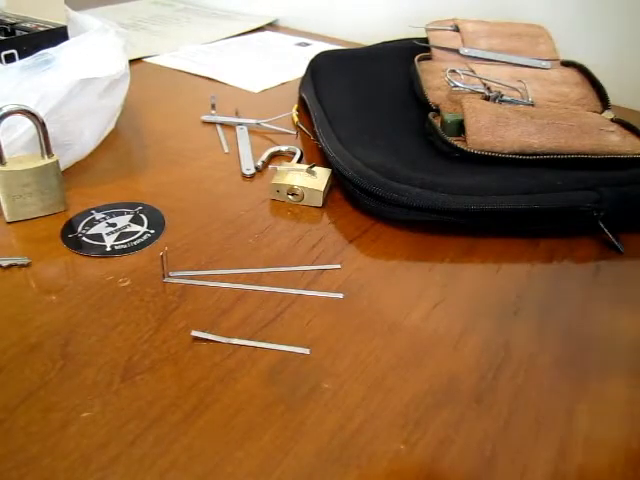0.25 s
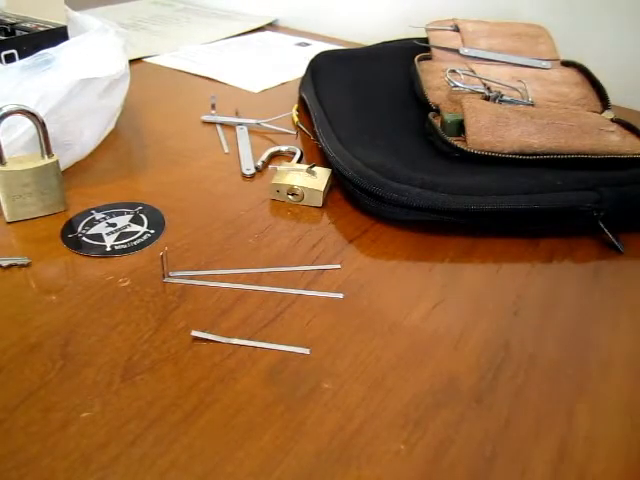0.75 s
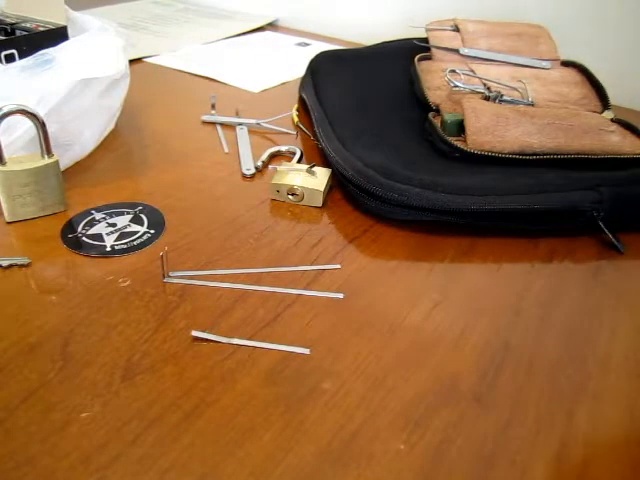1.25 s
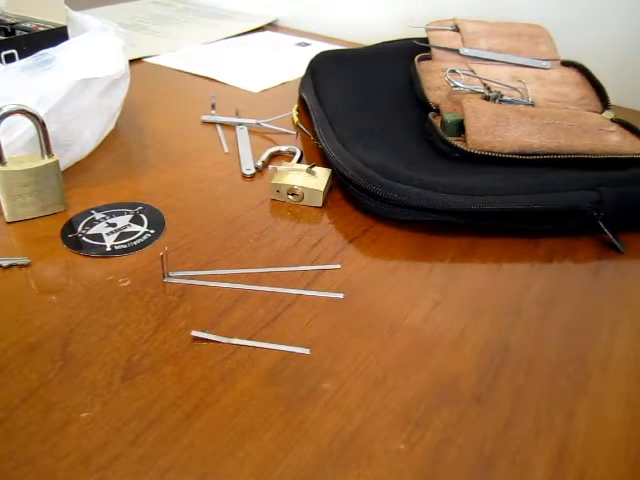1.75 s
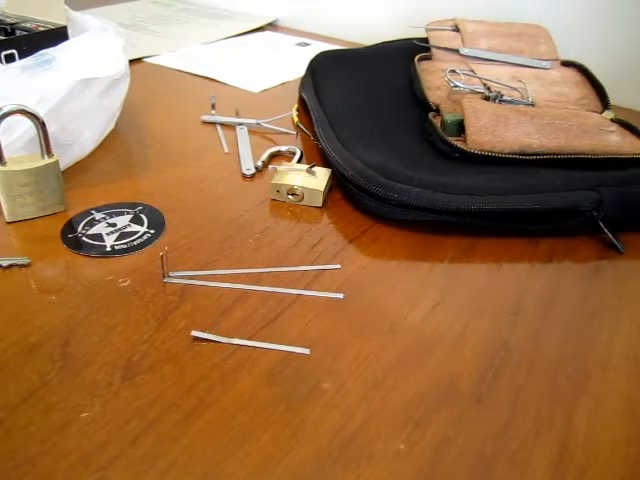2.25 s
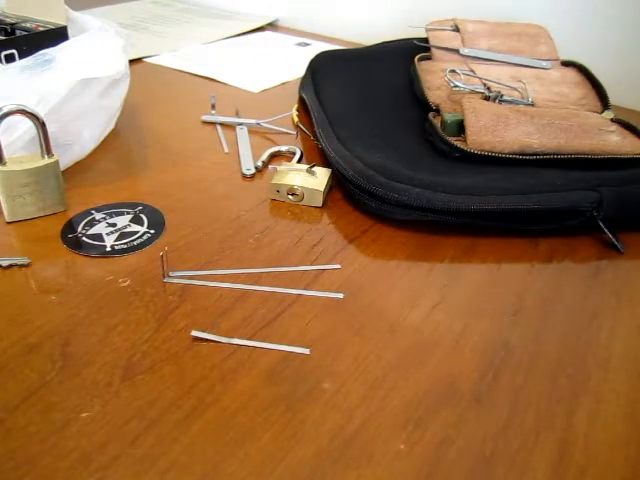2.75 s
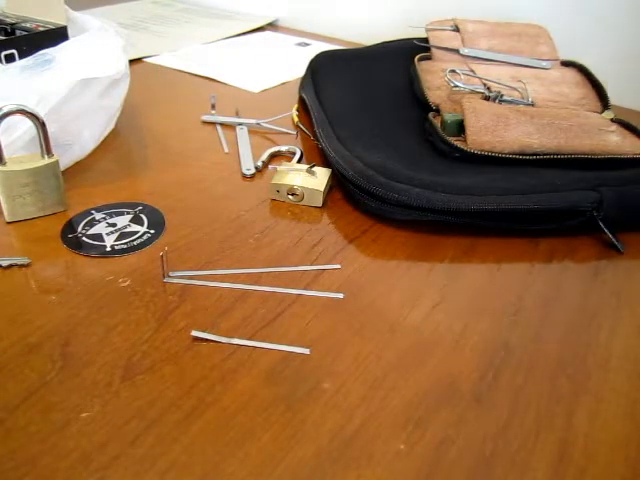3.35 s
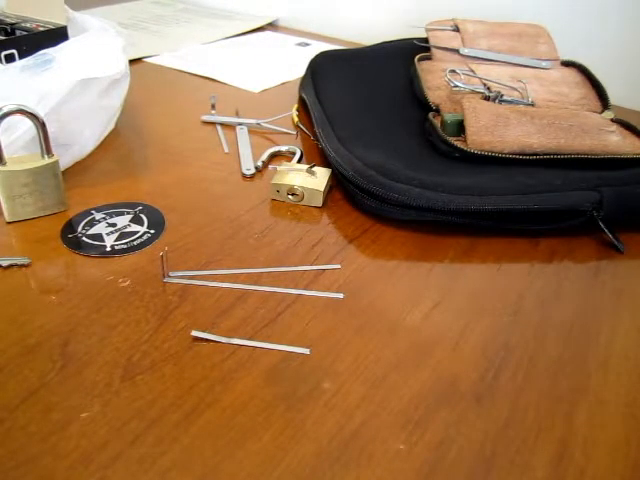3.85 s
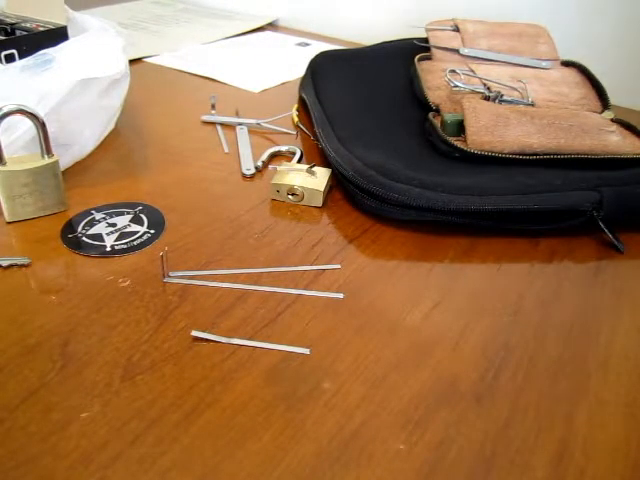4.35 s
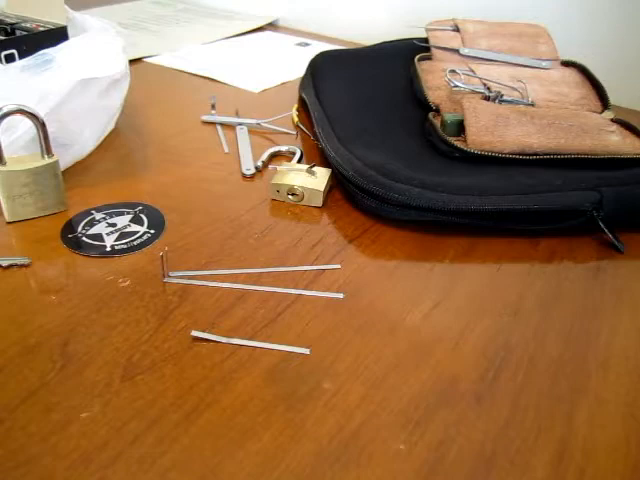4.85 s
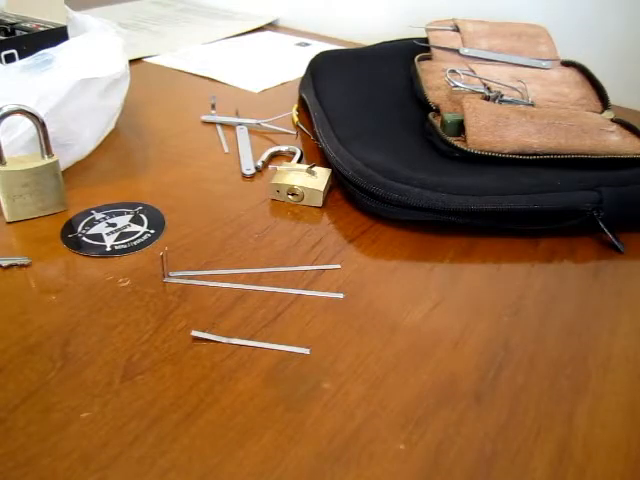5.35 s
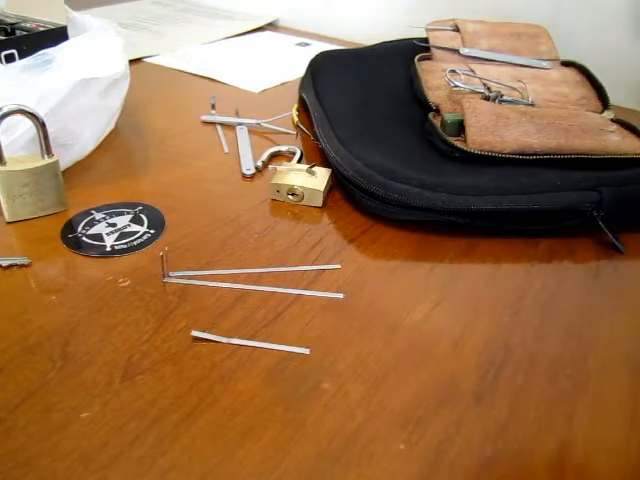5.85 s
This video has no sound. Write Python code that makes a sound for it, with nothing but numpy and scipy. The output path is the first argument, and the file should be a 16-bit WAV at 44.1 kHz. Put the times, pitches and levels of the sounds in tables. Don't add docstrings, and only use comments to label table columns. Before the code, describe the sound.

Steel handcuffs clink and jingle in hands close by, with ratchet clicks, a fast ratcheting zip and thin metallic ringing over low room hum.

```python
import sys
import numpy as np
from scipy import signal
from scipy.fft import rfft, irfft, next_fast_len
from scipy.io import wavfile
from scipy.ndimage import uniform_filter1d

SR = 44100
rng = np.random.default_rng(int(sys.argv[2]) if len(sys.argv) > 2 else 0)


def dump_mix(stems):
    frames = np.atleast_2d(stems).T
    limited = np.clip(frames, -1, 1)
    pcm = np.round(limited * 32767).astype(np.int16)
    wavfile.write(sys.argv[1], SR, pcm)


def voltage_ratio(decibels):
    exponent = np.asarray(decibels, float) / 20
    return 10 ** exponent


N = 268877
T = np.arange(N) / SR

# t/s, level/dB, colour centre f/kHz
TEETH = [(.7571, -2, 6), (.7653, -5, 6.4), (.7829, -11, 6.8), (.7887, -10, 7.1), (.8049, -10, 7.3),
         (.8107, -11, 7.2), (.8275, -14, 5.6), (.8349, -12, 8), (.85, -13, 8.3), (.8588, -13, 8.1),
         (.8793, -12, 7.3), (.897, -14, 6), (1.7501, -8, 4.9), (1.7745, -8, 5.2), (1.794, -9, 4.9),
         (1.8241, -10, 5.4), (1.8635, -11, 5.4), (1.8926, -10, 4.9)]
# f/Hz, level/dB
FIRST_PULL_COLOUR = [(1400, 0), (2300, -10), (3200, 0), (11000, 0), (14000, -3)]
# f/Hz, level/dB
STEEL_COLOUR = [(300, -26), (1100, -7.5), (2200, -6), (3000, 0), (9000, 0), (13000, -4), (15700, -10)]
CUFF_HZ = np.array([600, 1150, 1600, 2450, 3150, 3800, 4300, 5100, 6000, 6800, 7900, 9300, 10300, 11700, 13500])
# t/s, level/dB, colour centre f/kHz
CHAIN = [(0.1266, -21, 5), (0.1851, -24.5, 5.1), (0.2349, -24.5, 6.3), (0.2649, -20.5, 5.0),
         (0.2748, -11.5, 7.5), (0.2989, -14.5, 6.5), (0.3419, -20.5, 6.7), (0.4728, -8.5, 6.5),
         (0.5221, -19.5, 7.0), (0.5737, -22.5, 6.8), (0.5981, -17.5, 5.0), (0.6582, -20.5, 5.2),
         (1.0937, -29.5, 7.0), (1.1936, -33.5, 5.9), (1.2167, -36.5, 6.1), (1.2828, -31.5, 4.6),
         (1.3596, -29.5, 5.7), (1.5015, -19, 4.8),
         (1.99, -24.5, 4.6), (2.0236, -24.5, 4.9), (2.0323, -23.5, 5.3), (2.0422, -19.5, 5.2),
          (2.0476, -16.5, 4.8), (2.0556, -18.5, 5.2), (2.1113, -25.5, 5.6), (2.2646, -28.5, 8.3),
          (2.31, -22.5, 4.4), (2.3329, -26.5, 3.4), (2.3864, -18.5, 6.8), (2.4433, -28.5, 4.9),
          (2.6522, -27.5, 4.8), (2.6963, -31.5, 3.5), (2.7313, -29.5, 3.2), (2.7362, -30.5, 3.1),
          (2.9771, -22.5, 5.2), (3.0059, -23.5, 4.4), (3.0286, -25.5, 4.2), (3.0391, -18.5, 4.4),
          (3.102, -26.5, 4.6), (3.1988, -37.5, 5.2), (3.3695, -34.5, 5.1), (3.4066, -32.5, 4.4),
          (3.4393, -27.5, 5.0),
         (3.673, -21.5, 4.2), (3.7041, -17.5, 6.6), (3.7404, -21.5, 6.9), (3.7568, -15, 5.5),
         (3.926, -25.5, 5.8), (3.9335, -25.5, 5.6), (4.2311, -22, 3.5), (4.323, -26.5, 4.7),
         (4.4416, -22.5, 5.9), (4.4476, -7.5, 5.1), (4.5384, -23.5, 5.4), (4.7713, -18.5, 5.6),
         (4.962, -28.5, 4.0), (5.0491, -28.5, 6.2), (5.1388, -21.5, 5.8), (5.1495, -4.5, 5.0),
         (5.1527, -3.5, 5.1), (5.1605, -14.5, 5.1), (5.1886, -14.5, 4.8), (5.5522, -13.5, 4.7),
         (5.5599, -19.5, 6.7), (5.7254, -25.5, 5.9), (5.7439, -20.5, 4.0), (5.8735, -19.5, 4.8),
         (6.0485, -28.5, 5.5), (6.073, -28.5, 7.9), (6.0909, -15.5, 3.8)]
# t/s, level/dB, colour centre f/kHz
TICKS = [(0.0697, -41, 6.7), (0.074, -38, 7.4), (0.0892, -33, 5.7), (0.9792, -36, 5.7), (1.0695, -29, 6.4),
         (1.1071, -33, 6.3), (1.1797, -46, 5.3), (1.2386, -46, 6.0), (1.2608, -33, 6.4), (1.3673, -29, 4.9),
         (1.3865, -29, 4.4), (1.5721, -34, 5.3), (1.6033, -39, 5.5), (1.9667, -30, 4.4), (1.9799, -28, 4.1),
         (2.0702, -24, 5.5), (2.1999, -38, 5.2), (2.2508, -36, 7.1), (2.2548, -34, 8.2), (2.3456, -32, 4.9),
         (2.3755, -35, 5.8), (2.4139, -33, 4.5), (2.4356, -34, 4.9), (2.5548, -41, 3.6), (2.6162, -30, 5.0),
         (2.6875, -33, 4.3), (2.9188, -45, 1.8), (2.9342, -44, 3.1), (2.9719, -33, 4.8), (3.0734, -34, 4.5),
         (3.1323, -34, 4.5), (3.3433, -46, 2.6), (3.3802, -41, 5.0), (3.6419, -42, 5.7), (3.7441, -18, 5.8),
         (4.0238, -29, 4.9), (4.0559, -35, 4.2), (4.1046, -40, 4.3), (4.1467, -44, 4.0), (4.2086, -36, 5.4),
         (4.6236, -39, 5.8), (4.6626, -42, 3.2), (4.7252, -45, 3.8), (5.6835, -31, 5.3)]
# t/s, level/dB, colour centre f/kHz
TAPS = [(.4697, -26, 9), (2.31, -30, 2.2), (2.333, -34, 2.2), (2.387, -36, 1), (2.466, -34, 1.6),
        (2.495, -32, 4.8), (2.735, -35, 2.2), (3.006, -28, 3), (3.043, -24, 4.3), (3.354, -42, 2.4),
        (3.468, -38, .9), (3.487, -38, 1.6), (3.801, -20, 5), (3.817, -22, 6), (3.994, -28, 4),
        (5.104, -38, 2), (5.57, -26, 8)]
# t/s, level/dB, colour centre f/kHz
KNOCKS = [
    (.473, -28, .6),
    (.7571, -33, 1.4),
    (5.1497, -28, 1.1),
    (5.4294, -11, 2.4),
]

# f/Hz, mode group (column of the touch table), share/dB, t60/s
KEY_MODES = [(3060, 1, 2, .45), (4478, 2, 1.5, .35), (5430, 3, -5, .22), (5505, 3, -7, .22),
             (7456, 4, 4.5, .4), (6460, 5, -10, .3), (8480, 5, -2, .4), (9097, 5, -3.5, .4),
             (9372, 5, -9, .3), (11450, 5, -6.5, .4), (11929, 5, -8.5, .3), (12295, 5, -9.5, .3),
             (14140, 5, -9.5, .3), (14720, 5, -16, .3)]
# t/s, bend level/dB, twist level/dB, upper
# modes level/dB, time until it swings back/s
KEY_STRIKES = [(0, -47, -56, -46, .12), (.129, -39, -42, -42, .016), (.186, -32.5, -56, -42, .08),
               (.268, -32, -50, -35, .01), (.276, -34, -36, -27, .02), (.296, -39, -55, -36, .03),
               (.338, -47, -48, -39, .07), (.406, -47, -41, -41, .07), (.472, -45, -27, -33, .01),
               (.51, -41, -48, -41, .09), (.598, -43, -51, -35, .06), (.659, -29, -48, -36, .025),
               (1.017, -62, -46, -62, .04), (1.055, -52, -60, -48, .045), (1.348, -46, -59, -47, .045),
               (1.39, -39, -60, -41, .05), (1.504, -31, -53, -39, .008), (2.254, -62, -55, -48, .04),
               (3.034, -42, -56, -70, .022),
               (3.657, -48, -62, -52, .022), (3.677, -38, -40, -45, .032), (3.707, -35, -33, -36, .045),
              (3.755, -32, -25, -28, .02), (3.774, -33, -39, -32, .03), (3.8, -25, -32, -29, .03),
              (3.824, -22, -28, -31, .03), (3.85, -26, -44, -37, .04), (3.938, -38, -38, -38, .02),
              (3.996, -34, -46, -56, .01),
               (4.233, -23, -45, -52, .013), (4.244, -40, -37, -52, .078), (4.343, -43, -61, -41, .055),
             (4.395, -42, -61, -47, .06), (4.449, -23, -32, -31, .014), (4.461, -29, -35, -38, .05),
             (4.772, -36, -48, -44, .02), (4.786, -28, -46, -37, .036), (4.82, -36, -43, -38, .14),
             (4.95, -37, -46, -48, .11), (5.052, -46, -42, -45, .09), (5.191, -28, -61, -40, .042),
             (5.377, -40, -56, -52, .045), (5.479, -25, -60, -34, .031), (5.566, -51, -62, -50, .17),
             (5.728, -60, -60, -41, .02), (5.746, -33, -42, -40, .07), (5.876, -30, -43, -42, .018),
             (6.051, -44, -57, -43, .05), (6.093, -22, -41, -37, .02)]
GRIPS_S = [.147, .753, 1.11, 1.621, 2.3, 3.066, 5.143, 5.429]
REST_DB = np.array([-48, -52, -50, -53, -51])
# start t/s, end t/s
HELD_S = [(.75, 1.2), (1.62, 3.63)]
# t/s, f/Hz, level/dB, time until
# damped/s
CHIMES = [(0.13, 14170, -36, 0.019), (0.186, 7450, -39, 0.042), (0.191, 12320, -41, 0.026),
          (0.237, 7470, -38, 0.019), (0.266, 11460, -30, 0.025), (0.268, 14130, -36, 0.058),
          (0.271, 7450, -35, 0.034), (0.274, 9090, -28, 0.016), (0.279, 12300, -30, 0.012),
          (0.304, 8510, -33, 0.004), (0.335, 9150, -38, 0.029), (0.367, 8460, -43, 0.062),
          (0.512, 7450, -38, 0.028), (0.526, 12300, -42, 0.028), (0.602, 8550, -35, 0.015),
          (0.662, 9110, -39, 0.059), (0.663, 7490, -34, 0.084), (0.664, 6460, -43, 0.082),
          (0.67, 8480, -43, 0.077), (0.673, 11950, -41, 0.022), (1.072, 9070, -38, 0.014),
          (1.37, 7470, -43, 0.072), (1.391, 11460, -42, 0.052), (3.705, 8530, -37, 0.015),
          (3.706, 11950, -36, 0.026), (3.711, 6460, -34, 0.013), (3.713, 5450, -32, 0.023),
          (3.752, 14150, -38, 0.021), (3.753, 7410, -31, 0.014), (3.754, 8480, -33, 0.029),
          (3.756, 5450, -19, 0.008),
          (3.762, 9110, -37, 0.032), (3.767, 11460, -37, 0.014), (3.771, 11930, -36, 0.008),
               (3.777, 7450, -30, 0.077), (3.783, 14100, -42, 0.144), (3.793, 8480, -30, 0.05),
               (3.8, 11390, -34, 0.026), (3.801, 5450, -29, 0.01), (3.805, 11930, -30, 0.007),
               (3.817, 9090, -33, 0.033), (3.841, 5430, -31, 0.004), (4.343, 9090, -41, 0.048),
               (4.451, 11930, -32, 0.006), (4.452, 9390, -31, 0.008), (4.453, 5450, -27, 0.014),
               (4.453, 7450, -35, 0.075), (4.453, 14150, -48, 0.133), (4.455, 9090, -36, 0.015),
               (4.47, 8480, -40, 0.039), (4.48, 5490, -35, 0.023), (4.78, 12300, -39, 0.044),
               (4.785, 11930, -40, 0.019), (4.788, 7450, -32, 0.021), (4.797, 9090, -40, 0.106),
               (4.819, 7450, -37, 0.093), (5.054, 7450, -41, 0.077), (5.191, 7450, -39, 0.193),
               (5.236, 11460, -47, 0.085), (5.497, 7450, -29, 0.006), (5.737, 9110, -43, 0.129),
               (5.756, 7450, -40, 0.109)]
# t/s, high mode level/dB, middle mode level/dB, low mode level/dB
RING_TOUCHES = [(0, -52, -66, -80), (.289, -32, -77, -80), (.361, -48, -75, -83), (.475, -31, -32, -80),
                (.527, -38, -57, -80), (.585, -45, -69, -80), (.659, -67, -77, -83), (1.39, -49, -77, -83),
                (1.46, -72, -77, -83), (3.36, -62, -74, -74), (3.44, -50, -50, -80), (3.47, -51, -56, -80),
                (3.65, -44, -78, -80), (3.675, -48, -78, -40), (3.735, -66, -70, -48), (3.8, -61, -68, -43),
                (3.85, -62, -68, -70), (3.961, -60, -71, -80), (4.236, -64, -69, -80)]
# f/Hz, column of the touch table, share/dB, t60/s
RING_MODES = [(10944, 1, 0, .9), (7881, 2, 0, .5), (1170, 3, 0, .3)]

# t/s of the peak, link rattle level/dB, finger rub level/dB, fade t60/s
MOVES = [(0, -35, -61, .2), (.075, -47, -64, .9), (.19, -46, -60, .6), (.275, -31, -48, .4),
         (.475, -34, -45, .9), (.6, -36, -51, .3), (.66, -35, -49, .4), (.9, -44, -64, .8),
         (1.06, -41, -54, .6), (1.26, -45, -58, 1), (1.36, -38, -58, .9), (1.47, -42, -62, .75),
         (1.92, -36, -52, 1.1), (2.04, -34, -46, .55), (2.26, -37, -52, .6), (2.39, -42, -46, 1),
         (2.48, -42, -45, .5), (2.605, -39, -53, .55), (2.64, -39, -52, .35), (2.99, -40, -55, .9),
         (3.1, -45, -56, .5), (3.44, -40, -52, .3), (3.475, -52, -39, .5), (3.68, -41, -48, .8),
         (3.79, -28.5, -42, .5), (4, -40, -56, .6), (4.34, -47, -57, 1.2), (4.455, -36, -50, .8),
         (4.795, -36, -49, 1.4), (5.18, -34, -54, .75), (5.52, -34, -48, .7), (5.73, -41, -65, .6),
         (6.05, -43, -51, 1.1)]
# f/Hz, level/dB
RATTLE_COLOUR = [(1500, -20), (3000, 1.5), (5200, 5.5), (8000, -2.5), (11000, -.5), (15500, -8.5)]
# f/Hz, width/Hz, level/dB
LINK_MODES = [(2300, 350, -9), (3080, 120, 0), (4440, 260, 0), (5200, 250, 0), (6200, 300, -5),
              (8400, 500, -5)]
# f/Hz, level/dB
HUM_COLOUR = [(12, -38), (20, 2.5), (42, 1.5), (393, -10.5), (1720, -24), (2470, -33), (4680, -29),
              (15500, -56)]
# t/s, level/dB
HUM_LEVEL = [(0, -53), (.74, -53), (.83, -60), (1.7, -55), (1.9, -58), (2.35, -52), (3.3, -49), (5.13, -47),
             (5.2, -55), (6.1, -55)]


def unit(x):
    return x / np.sqrt(np.mean(x ** 2))


def colour(x, points):
    hz, db = np.transpose(points)
    size = next_fast_len(len(x))
    f = np.maximum(np.arange(size // 2 + 1) * SR / size, 1)
    gain = voltage_ratio(np.interp(np.log(f), np.log(hz), db))
    return irfft(rfft(x, size) * gain, size)[:len(x)]


def grains(rate, spread_db, t60):
    size = voltage_ratio(spread_db * np.minimum(rng.exponential(size=N), 4.5))
    hits = (rng.random(N) < rate / SR) * size
    gate = signal.lfilter([1], [1, -1000 ** (-1 / (t60 * SR))], hits)
    return gate * rng.standard_normal(N)


def grazes(count):
    moments = np.sort(rng.random(count)) * N
    return rng.standard_normal(count + 1)[np.searchsorted(moments, np.arange(N))]


def clicks(table, ring_t60, crack_t60, crack_db, gain_db, spread_oct=.8, scatter_db=4.0, rise_s=.0001):
    out = np.zeros(N + 1024)
    t = np.arange(1024) / SR
    khz = np.maximum(np.arange(513) * SR / 1024, 50) / 1000
    for s, db, centre in table:
        detune, scatter = rng.standard_normal((2, len(CUFF_HZ), 1))
        hz = np.asarray(CUFF_HZ)[:, None] * (1 + .03 * detune)
        octaves = np.log2(hz / 1000 / centre)
        size = np.exp(-(octaves / spread_oct) ** 2 / 2) * voltage_ratio(scatter_db * scatter)
        ring = np.sum(size * np.sin(2 * np.pi * hz * t), axis=0) * 1000 ** (-t / ring_t60)
        burst = rng.standard_normal(len(t)) * 1000 ** (-t / crack_t60)
        crack = irfft(rfft(burst) * np.exp(-np.log2(khz / centre) ** 2 / 2))
        both = ring / np.linalg.norm(ring) + voltage_ratio(crack_db) * crack / np.linalg.norm(crack)
        both = both * np.minimum(t / rise_s, 1)
        at = int(s * SR)
        out[at:at + len(t)] += voltage_ratio(db + gain_db) * both / np.linalg.norm(both)
    return out[:N]


def pawl_bounces():
    delay_s, loss_db, khz = .0077, -10.5, 8
    gaps = np.diff([row[0] for row in TEETH] + [np.inf])
    return [(s + delay_s, db + loss_db, khz) for (s, db, _), gap in zip(TEETH, gaps) if gap > delay_s + .002]


def zip_teeth(count):
    start_s, gap_s, slowing, uneven_s = 5.4294, .0046, .14, .0007
    u = np.arange(count) / (count - 1)
    s = start_s + gap_s * np.arange(count) * (1 + slowing * u)
    s = s + uneven_s * rng.standard_normal(count) * (u > 0)
    db = -11 - 8 * u ** 2
    khz = 4.4 + 3.6 * np.sin(np.pi * u) ** 2
    return np.transpose([s, db, khz])


def ratchet():
    slow = clicks(TEETH + pawl_bounces(), .012, .008, 0, 15)
    fast = clicks(zip_teeth(count=17), .022, .018, 3, 17.5, spread_oct=1.1)
    teeth = slow + fast
    teeth = np.where(T < HELD_S[0][1], colour(teeth, FIRST_PULL_COLOUR), teeth)
    return colour(teeth, STEEL_COLOUR)


def chain_and_hinge():
    main = clicks(CHAIN, .022, .016, 1.5, 15.5, rise_s=.0009)
    ticks = clicks(TICKS, .018, .012, 0, 14.5)
    return colour(main + ticks, STEEL_COLOUR)


def cuff_body():
    knocks = clicks(KNOCKS, .06, .03, -6, 16, spread_oct=.25)
    return knocks + clicks(TAPS, .03, .015, -3, 15, spread_oct=.4)


def ringing(touches, modes, scatter_db, detune, settle_s, swing_db):
    touches = np.array(touches, float)
    out = np.zeros(N)
    last = np.maximum(np.searchsorted(touches[:, 0], T, side="right") - 1, 0)
    since = T - touches[last, 0]
    chance = rng.standard_normal((len(touches), len(modes), 3))
    width = max(int(settle_s * SR), 1)
    for k, (hz, column, share_db, t60) in enumerate(modes):
        upper = column == 5
        db = touches[:, int(column)] + share_db + upper * scatter_db * chance[:, k, 0]
        swing = swing_db * (1 + upper) * (np.minimum(grazes(count=450), .8) - upper / 8)
        size = uniform_filter1d(voltage_ratio(db[last] - 60 * since / t60 + swing), width)
        turn = np.cumsum(hz * (1 + detune * chance[last, k, 2])) / SR
        phase = uniform_filter1d(2 * chance[last, k, 1] + .12 * swing, width)
        out += np.sqrt(2) * size * np.sin(2 * np.pi * turn + phase)
    return out


def key_touches():
    pair_db, second_bend_db = 5, -6
    spread_db, spread_share = -43, .3
    kept, loss_db = .3, 2
    grip_db = -66
    s, bend, twist, upper, free = np.array(KEY_STRIKES, float).T
    pair = (twist + upper) / 2 + pair_db
    second_bend = (bend + upper) / 2 + second_bend_db
    db = np.array([bend, twist, pair, second_bend, upper]).T
    db[:, 2:] = np.minimum(db[:, 2:], spread_db + spread_share * (db[:, 2:] - spread_db))
    rest = np.asarray(REST_DB)
    damped = np.minimum(db - loss_db - 130 * free[:, None], rest + kept * (db - rest))
    struck_first = s + free >= np.append(s[1:], np.inf)
    back = np.where(struck_first, np.inf, s + free)
    grips = np.full((len(GRIPS_S), db.shape[1]), grip_db)
    table = np.column_stack([np.concatenate([s, back, GRIPS_S]), np.vstack([db, damped, grips])])
    return table[np.argsort(table[:, 0], kind="stable")]


def key():
    return ringing(key_touches(), KEY_MODES, scatter_db=2.8, detune=.002, settle_s=.0015, swing_db=3.2)


def chimes():
    t60_s, damped_t60_s, rise_s = .45, .045, .0015
    t = np.arange(SR // 4) / SR
    out = np.zeros(N + len(t))
    for s, hz, db, free in CHIMES:
        fall = db - 60 * t / t60_s - 60 * np.maximum(t - free, 0) / damped_t60_s
        flicker = uniform_filter1d(np.repeat(rng.standard_normal(32), 400)[:len(t)], 120)
        size = voltage_ratio(fall + 2.5 * np.minimum(flicker, .8)) * np.minimum(t / rise_s, 1)
        at = int(s * SR)
        out[at:at + len(t)] += np.sqrt(2) * size * np.sin(2 * np.pi * hz * t + .8 * flicker)
    return out[:N]


def jingle():
    t60_s, level_db, held_share = .07, -4.5, .2
    out = np.zeros(N)
    for hz, _, share_db, _ in KEY_MODES:
        pole = np.exp(2j * np.pi * hz / SR) * 1000 ** (-1 / (t60_s * SR))
        tinkle = signal.lfilter([1], [1, -pole], grains(45, 3.0, .004)).imag
        out += voltage_ratio(share_db) * unit(tinkle)
    held = sum((T > a) & (T < b) for a, b in HELD_S)
    return unit(out) * voltage_ratio(level_db) * moves(column=1) * np.where(held, held_share, 1)


def small_ring():
    return ringing(RING_TOUCHES, RING_MODES, scatter_db=0, detune=.0004, settle_s=.001, swing_db=.8)


def moves(column):
    rise_db_s, still_db = 600, -68
    rows = np.array(MOVES)
    coarse = T[::64]
    since = coarse - rows[:, :1]
    slope = np.where(since < 0, rise_db_s, -60 / rows[:, 3:])
    db = rows[:, column, None] + slope * since
    level = np.sqrt(np.sum(voltage_ratio(db) ** 2, axis=0) + voltage_ratio(still_db) ** 2)
    return np.interp(T, coarse, level)


def rattle():
    links = unit(colour(grains(1100, 2.6, .016), RATTLE_COLOUR)) * voltage_ratio(-5)
    for hz, width, db in LINK_MODES:
        pole = np.exp((2j * hz - width) * np.pi / SR)
        mode = signal.lfilter([1], [1, -pole], grains(160, 3.2, .012)).imag
        links = links + voltage_ratio(db - 8.5) * unit(mode)
    skin_colour = [(250, -24), (700, -4), (1500, -3), (3000, -6), (6000, -24)]
    rub = unit(colour(grains(900, 2.3, .03), skin_colour)) * voltage_ratio(3.5)
    return links * moves(column=1) + rub * moves(column=2)


def room(x, t60=.3, wall_s=.0045):
    t = np.arange(SR // 2) / SR
    tail = rng.standard_normal(len(t)) * 1000 ** (-t / t60) * (t > wall_s)
    tail = colour(tail, [(500, -15.5), (3000, 0), (8000, -3), (15000, -2.5)])
    return signal.fftconvolve(x, tail / np.sqrt(np.sum(tail ** 2)))[:N]


def room_hum():
    s, db = np.transpose(HUM_LEVEL)
    return unit(colour(rng.standard_normal(N), HUM_COLOUR)) * voltage_ratio(np.interp(T, s, db))


def scene():
    teeth = ratchet()
    hard = teeth + chain_and_hinge() + cuff_body()
    sung = key() + chimes() + jingle() + small_ring()
    to_room = hard - .35 * teeth + voltage_ratio(-5) * sung
    return (hard + sung + rattle() + voltage_ratio(-8) * room(to_room) + room_hum())[None]


def band_limit(x):
    return signal.sosfilt(signal.butter(12, 16440, fs=SR, output="sos"), x)


def record(dry):
    low_pass = signal.ellip(8, .2, 60, 15650, fs=SR, output="sos")
    clipped = np.clip(signal.sosfilt(low_pass, dry), -1, 1)
    return band_limit(clipped)


dry = scene()
out = record(dry)
dump_mix(out)
```